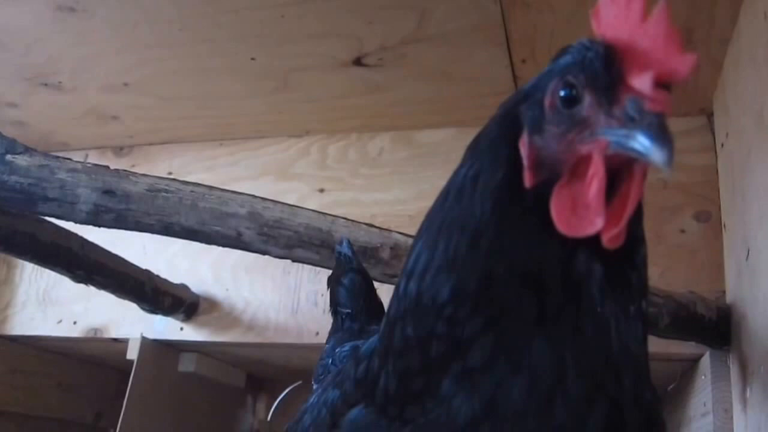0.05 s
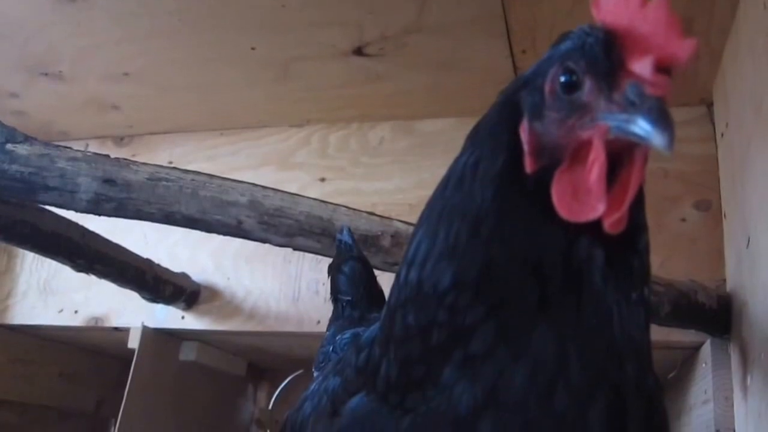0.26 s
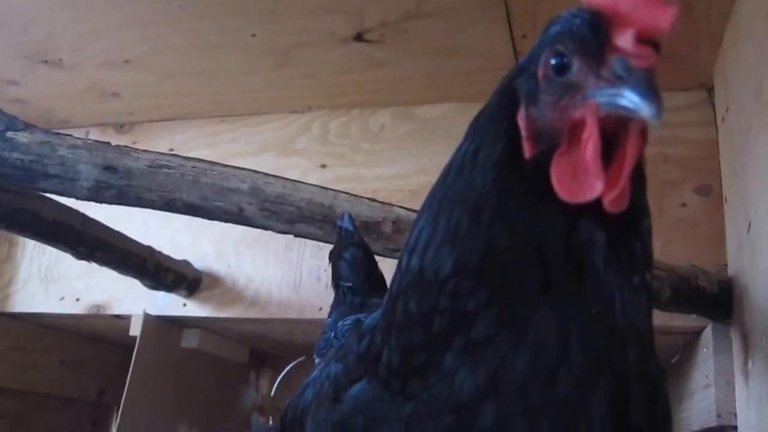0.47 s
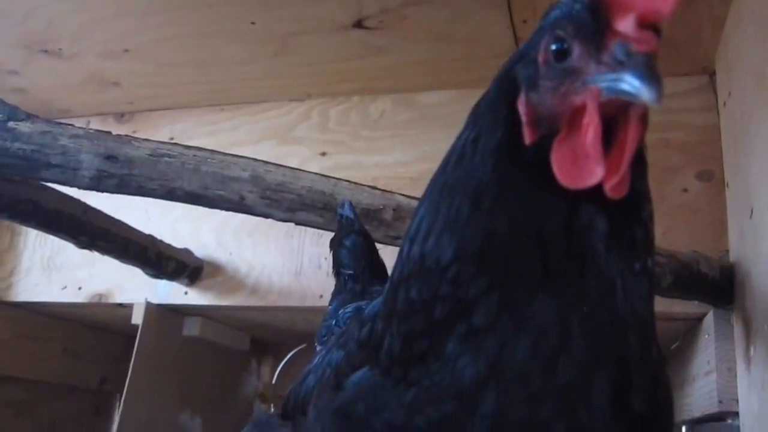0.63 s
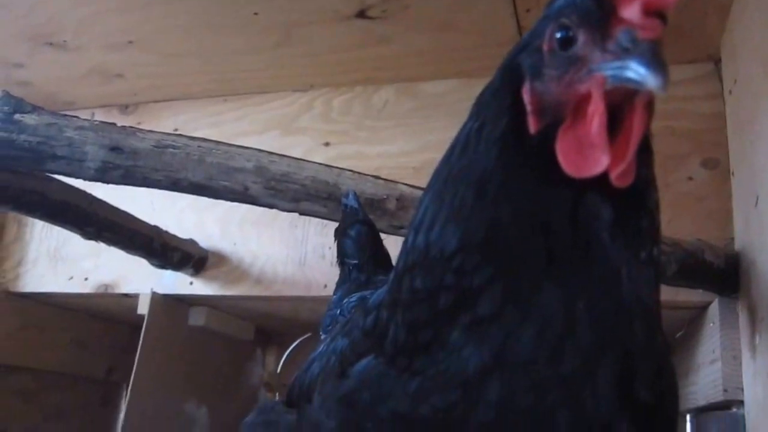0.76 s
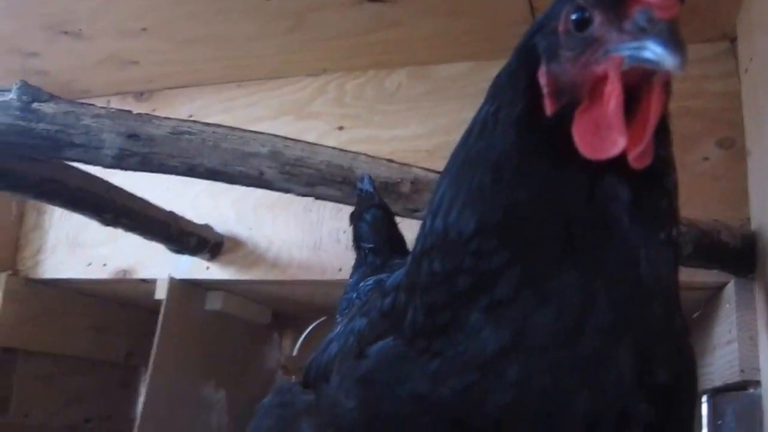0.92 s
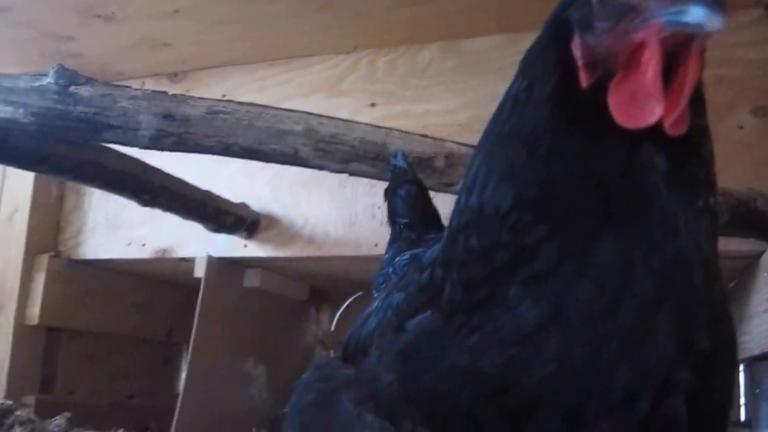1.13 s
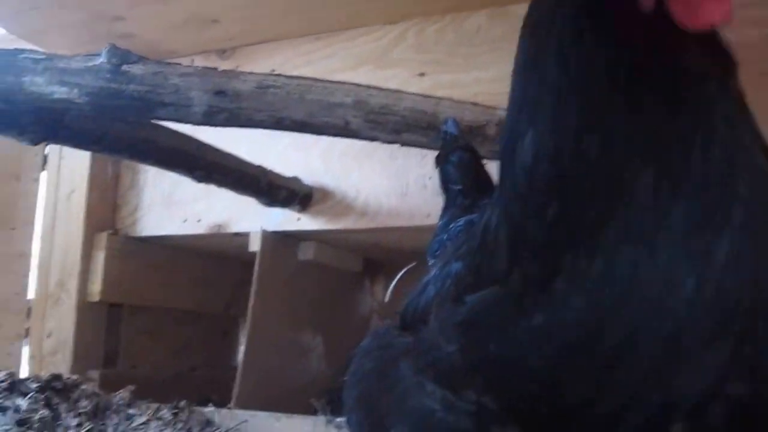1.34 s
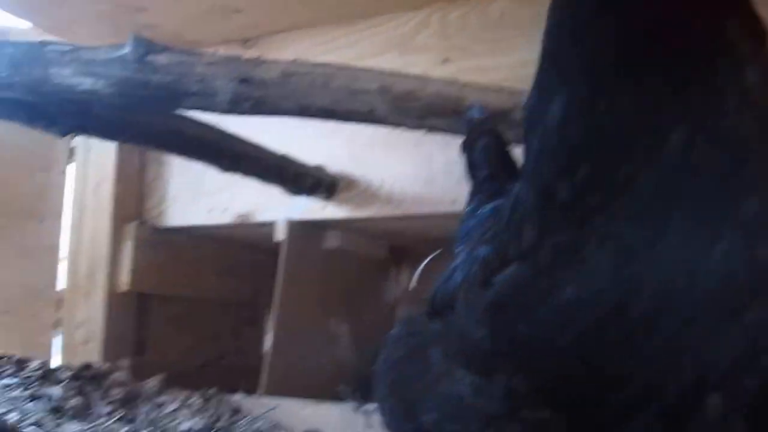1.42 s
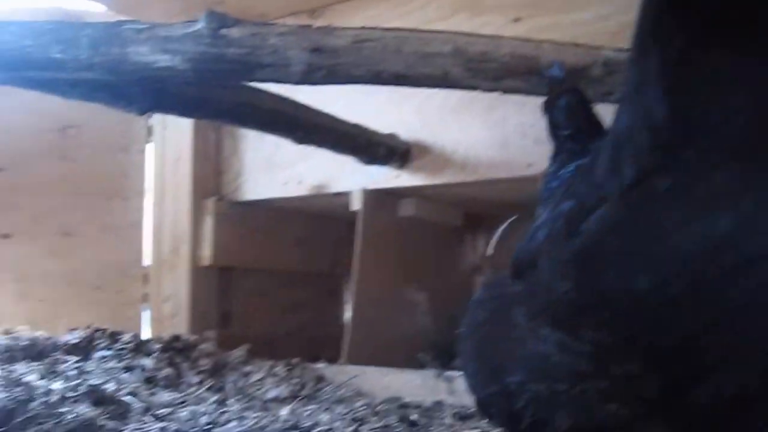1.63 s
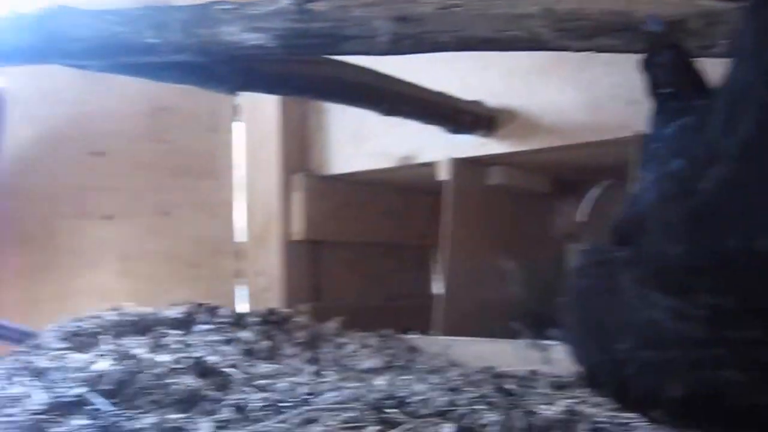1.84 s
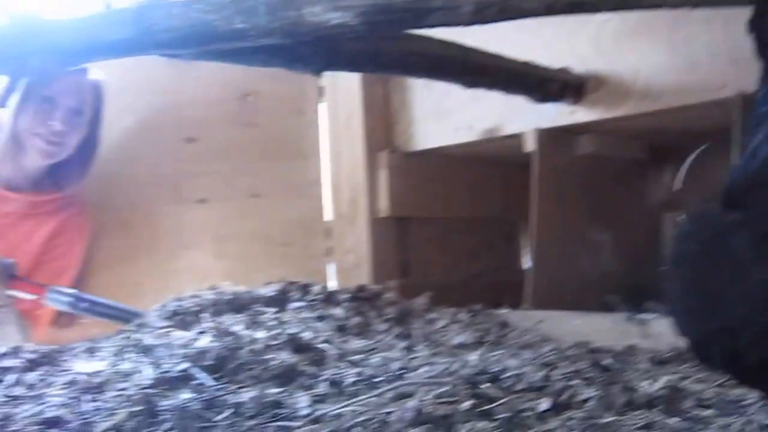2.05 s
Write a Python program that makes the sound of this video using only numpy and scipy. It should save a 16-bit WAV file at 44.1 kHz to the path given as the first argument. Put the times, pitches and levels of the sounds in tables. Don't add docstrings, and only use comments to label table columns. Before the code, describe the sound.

Hen close by: a raspy, fading croon, then five soft clucks, with creaky handling clicks at the end

```python
import sys
import numpy as np
from scipy import signal
from scipy.fft import rfft, irfft
from scipy.io import wavfile
from scipy.ndimage import uniform_filter1d

SR = 44100
rng = np.random.default_rng(int(sys.argv[2]) if len(sys.argv) > 2 else 0)


def transcribe(signal):
    frames = np.atleast_2d(signal).T
    limited = np.clip(frames, -1, 1)
    pcm = np.round(limited * 32767).astype(np.int16)
    wavfile.write(sys.argv[1], SR, pcm)


def gain_from_db(level_db):
    decades = np.asarray(level_db, float) / 20
    return 10 ** decades


N = 91948

# t/s, effort/dB, pitch f/Hz, pitch glide/share, mouth opening/0-1
CLUCKS = [
    (1.074, -39.5, 320, -.16, .05),
    (1.288, -43.5, 288, .04, .5),
    (1.505, -40.5, 390, .25, .7),
    (1.724, -39.5, 390, .26, .95),
    (1.925, -32.5, 395, .4, .15),
]


def evened(x):
    return x / np.sqrt(np.mean(x ** 2) + 1e-20)


def read(points, hz):
    f, value = np.transpose(points)
    return np.interp(np.log(hz + 1), np.log(f + 1), value)


def add(mix, s, sound):
    part = mix[..., round(s * SR):][..., :sound.shape[-1]]
    part += sound[..., :part.shape[-1]]


def wander(n, per_s):
    span = max(int(SR / per_s), 1)
    return evened(uniform_filter1d(uniform_filter1d(rng.standard_normal(n), span), span))


def resonate(x, hz, width):
    turn = np.exp(2j * np.pi * np.cumsum(hz * np.ones(len(x))) / SR)
    r = np.exp(-np.pi * width / SR)
    return 2 * (turn * signal.lfilter([(1 - r) ** 2], [1, -2 * r, r * r], x / turn)).real


def syrinx(hz, jitter, rough, count):
    turns = np.cumsum(hz * (1 + jitter * wander(len(hz), 144))) / SR
    smear = .13
    folds = sum(np.cos(2 * np.pi * (k * turns + smear * k * k)) for k in range(1, count))
    puffs = (0.16 + np.exp(-(turns % 1) / 0.35)) * rng.standard_normal(len(hz))
    rough = np.clip(rough, 0, 1)
    return (1 - rough) * evened(folds) + rough * 4.4 * evened(puffs)


def drawl():
    # t/s, effort level/dB, faster membrane/share, mouth opening/0-1, beak f/Hz
    call = [
        (0, -40, 0.15, 0.19, 1220),
        (.11, -43.5, 0.1, 0.2, 1120),
        (.16, -43, 0.47, 0.56, 1100),
        (.23, -38.5, 0.55, 0.44, 1130),
        (.33, -42, 0.68, 0.9, 1147),
        (.42, -39, 0.84, 0.72, 1196),
        (.46, -43, 1, 1.1, 1234),
        (.5, -44.5, 0.7, 1.25, 1200),
        (.525, -64, .9, 1.1, 1190),
    ]
    # shut f/Hz, open f/Hz, width/Hz, shut level/dB, open level/dB
    throat = [(343, 380, 120, -8.5, -8), (585, 520, 110, 3, -2), (657, 660, 100, -7, -2),
              (880, 760, 150, -12, -5), (1500, 1500, 900, -16, -17)]
    jitter, rough, flutter_db = .03, .28, 2
    slow_hz, start_hz, settle_s, fast_hz = 109.5, 118, .07, 131
    beak_width_hz, beak_db = 220, -3.5

    t = np.arange(0, call[-1][0], 1 / SR)
    times, *columns = np.transpose(call)
    db, fast, mouth, beak = (np.interp(t, times, c) for c in columns)
    fast = np.clip(fast, 0, 1)
    falling_hz = slow_hz + (start_hz - slow_hz) * np.exp(-t / settle_s)
    slow_pulses = syrinx(falling_hz, jitter, rough, count=22)
    fast_pulses = syrinx(fast_hz + 0 * t, jitter, rough, count=19)
    drive = ((1 - fast) * slow_pulses + fast * fast_pulses) / np.hypot(fast, 1 - fast)

    voice = gain_from_db(beak_db) * resonate(drive, beak, beak_width_hz)
    for k, (shut_hz, open_hz, width, shut_db, open_db) in enumerate(throat):
        gain = gain_from_db(shut_db + (open_db - shut_db) * mouth)
        voice += (-1) ** k * gain * resonate(drive, shut_hz + (open_hz - shut_hz) * mouth, width)
    return evened(voice) * gain_from_db(db + flutter_db * wander(len(t), 50))


def cluck(db, hz, glide, mouth):
    shut_s, open_longer_s, rise_s, fall_s = .058, .022, .015, .022
    bend_shut, bend_open, bend_steep = .92, .27, 6.5
    rasp_hz, rasp_depth = 110.4, .8
    high_shut_db, high_open_db, shut_sag_db = -8, 3.5, -12

    length = shut_s + open_longer_s * mouth
    t = np.arange(0, length, 1 / SR)
    bend = bend_shut + (bend_open - bend_shut) * mouth
    pitch = hz * (1 + glide / 2 * np.tanh(bend_steep * (t / length - bend)))
    drive = syrinx(pitch, jitter=.028, rough=.31, count=7)
    rasp_turns = np.cumsum(rasp_hz * (1 + 0.16 * wander(len(t), 65))) / SR
    drive = drive * (1 + rasp_depth * np.sqrt(mouth) * np.cos(2 * np.pi * rasp_turns))

    throat = resonate(drive, 2 * pitch, 230)
    chest = gain_from_db(-9) * resonate(drive, 1.3 * pitch, 600)
    top = gain_from_db(-20) * resonate(drive, 1770, 250)
    beak = gain_from_db(high_shut_db + (high_open_db - high_shut_db) * mouth) * resonate(drive, 1190, 320)
    voice = throat + chest + top - beak
    shape = np.clip(np.minimum(t / rise_s, (length - t) / fall_s), 0, 1)
    sag = shut_sag_db * (1 - mouth) * t / length
    return gain_from_db(db + sag) * evened(voice) * np.sin(np.pi / 2 * shape) ** 2


def coop(x):
    level_db, t60_s = -8.5, .2
    t = np.arange(int(.2 * SR)) / SR
    taps = rng.choice([-1., 1.], (2, len(t))) * (rng.random((2, len(t))) < .05)
    taps = taps * gain_from_db(-60 * t / t60_s) * (t > .002)
    taps = taps / np.linalg.norm(taps[0])
    return x + gain_from_db(level_db) * signal.fftconvolve(x[None], taps, axes=1)[:, :N]


def creak():
    # t/s, peak level/dB, brightness/dB
    slips = [(1.8597, -36, -5), (1.8782, -35, -3), (1.9472, -35, -2), (1.9552, -32, -2), (1.9632, -31, -2),
             (1.9727, -24, -2), (1.9885, -31, -10), (2.003, -31, -6), (2.0152, -29, -2), (2.0251, -26, 0),
             (2.0335, -21.5, 0), (2.0419, -21, 0), (2.0507, -22, 1), (2.0618, -24, 0), (2.0742, -26.5, -1)]
    # f/Hz, left level/dB, right level/dB, t60/s
    shell = [(1500, -19, -14, .006), (2500, -9, -20, .003), (3800, -1, -8, .0035), (4800, -9, -18, .003),
             (5760, -9, -15, .006), (6700, -10, -24, .003), (9800, -13, -20, .0025),
             (11800, -9, -17, .0025)]
    bump_db = [
        [-6],
        [-16],
    ]
    lag_s, slip_s, bump_s = .0003, .0001, .0004
    tail_db, bright_hz = -20, 4500

    out, t = np.zeros((2, N)), np.arange(1500) / SR
    for s, db, bright_db in slips:
        scrape = rng.standard_normal((2, len(t))) * gain_from_db(tail_db) * np.exp(-t / .0015)
        slip = scrape - np.exp(-((t - lag_s) / slip_s) ** 2 * 8) / 2
        slip = slip * (t > lag_s - slip_s)
        ring = np.zeros((2, len(t)))
        for f, left_db, right_db, t60 in shell:
            tone = np.sin(2 * np.pi * f * (1 + .015 * rng.standard_normal()) * t)
            side_db = np.array([[left_db], [right_db]]) + bright_db * (f > bright_hz)
            ring += gain_from_db(side_db - 60 * t / t60) * tone
        click = signal.fftconvolve(slip, ring, axes=1)[:, :len(t)]
        u = np.maximum(t - lag_s - slip_s, 0) / bump_s
        bump = gain_from_db(np.array(bump_db)) * np.e * u * np.exp(-u)
        add(out, s, gain_from_db(db - .5) * (click + bump))
    return out


def straw():
    # t/s, peak level/dB, f/Hz
    snaps = [
        (0.26, -52.5, 4800),
        (1.307, -58, 11000),
        (1.39, -56, 9900),
        (1.452, -51.5, 10700),
        (1.977, -45.5, 8700),
        (1.977, -25.5, 950),
    ]
    out, t = np.zeros((2, N)), np.arange(1500) / SR
    for s, db, hz in snaps:
        burst = rng.standard_normal((2, len(t))) * np.exp(-t / 0.0022)
        snap = np.array([resonate(side, hz, 1.04 * hz) for side in burst])
        add(out, s, gain_from_db(db) * 3.6 * snap)
    return out


def feathers():
    # t/s, length/s, level/dB
    brushes = [
        (0.665, 0.2, -58.5),
        (1.837, 0.085, -62.5),
        (1.946, 0.026, -55.5),
        (2.001, 0.16, -53),
    ]
    out = np.zeros((2, N))
    for s, length, db in brushes:
        n = int(length * SR)
        fizz = rng.standard_normal((2, n)) * gain_from_db(1.5 * rng.exponential(1, n)) * np.hanning(n)
        add(out, s, gain_from_db(db) * evened(np.array([resonate(side, 4700, 14000) for side in fizz])))
    return out


def engine():
    # level/dB rms, wander/dB, load/share, air path/share
    orders = [(-49.5, -1.5, 0.45, 0.84), (-46, 1.5, .9, 0.39), (-55.5, 0, 0.24, 0),
              (-41.5, 0.54, 0.33, 0.018), (-47, -1, 0, 0.62), (-54, 2, 0.92, 0.36), (-51, 2.5, 0.085, 1.35),
              (-62, 2.5, 1, 0.48), (-75, 1, 0.62, 0)]
    multiples = (3, 4, 6, 8, 9, 12, 16, 20, 24)
    # t/s, level/dB
    load_points = [
        (0, -5),
        (.7, -2.5),
        (1.2, 2),
        (1.598, 2),
        (2.1, 4),
    ]
    # t/s, level/dB
    path_points = [
        (0, 4),
        (0.301, .5),
        (.65, 0.5),
        (.9, -3),
        (1.2, -4),
        (1.55, 1.5),
        (2.1, 0.5),
    ]
    cycle_hz, drift = 17.82, .0004

    t = np.arange(N) / SR
    turns = np.cumsum(cycle_hz * (1 + drift * wander(N, 2.8))) / SR
    load = np.interp(t, *np.transpose(load_points))
    path = np.interp(t, *np.transpose(path_points))
    out = np.zeros(N)
    for k, (db, wander_db, share, far) in zip(multiples, orders):
        level_db = db + share * load + far * path + wander_db * wander(N, 5.3)
        out += np.sqrt(2) * gain_from_db(level_db) * np.cos(2 * np.pi * (k * turns + rng.random()))
    return out * gain_from_db([[-.4], [.4]])


def whir():
    hz, width_hz, level_db, peak_s, spread_s = 1532, 61, -63, 0.97, 0.3
    t = np.arange(N) / SR
    air = resonate(rng.standard_normal(N), hz * (1 + 0.012 * wander(N, 4.1)), width_hz)
    return gain_from_db(level_db) * evened(air) * np.exp(-((t - peak_s) / spread_s) ** 2)


def wash():
    # f/Hz, level/dB per Hz
    colour = [(25, -7), (60, -3), (180, -5.5), (500, -12), (1500, -18), (2500, -25), (6000, -31),
              (15500, -39.5)]
    # f/Hz, correlation/-1 to 1
    likeness = [(60, 0.99), (180, 0.72), (550, 0.78), (1650, 0.62), (4970, -0.19), (15000, 0.18)]
    # f/Hz, level/dB
    balance = [(60, -7), (240, 0.5), (950, -1), (3770, -0.5), (15000, -1.5)]
    level_db, patch_db, swell_db = -45, 0.5, 1.02

    frames, hz = N // 256 + 5, np.fft.rfftfreq(1024, 1 / SR)
    a, b, c, d, patches = rng.standard_normal((frames, 513, 5)).T
    patches = evened(uniform_filter1d(uniform_filter1d(patches, 12, 0), 14, 1))
    swell = evened(uniform_filter1d(rng.standard_normal(frames), 30))
    same = np.clip(read(likeness, hz), -1, 1)[:, None]
    lean = read(balance, hz)[:, None] / 2
    left = a + 1j * b
    right = same * left + np.sqrt(1 - same ** 2) * (c + 1j * d)
    z = np.array([left * gain_from_db(lean), right * gain_from_db(-lean)])
    z *= gain_from_db(read(colour, hz)[:, None] + patch_db * patches + swell_db * swell)
    return gain_from_db(level_db) * evened(signal.istft(z, nperseg=1024, noverlap=768)[1][:, :N])


def scene():
    hen = np.zeros(N)
    add(hen, 0, drawl())
    for s, *row in CLUCKS:
        add(hen, s, cluck(*row))
    return coop(hen) + creak() + straw() + feathers() + engine() + whir() + wash()


def top_cut(x):
    return signal.sosfilt(signal.butter(12, 15930, fs=SR, output="sos"), x)


def record(dry):
    # f/Hz, level/dB rms
    whine_lines = [(8802, -78), (8823, -83), (8845, -92)]
    notch_hz, notch_width_hz, notch_db = 8190, 590, -18.5
    edge_hz, roll_hz = 15950, 13900

    hz = np.fft.rfftfreq(N, 1 / SR)
    notch = gain_from_db(notch_db / (1 + ((hz - notch_hz) / notch_width_hz) ** 2))
    colour = notch * (hz < edge_hz) / np.sqrt(1 + (hz / roll_hz) ** 8)
    t = np.arange(N) / SR
    whine = sum(np.sqrt(2) * gain_from_db(db) * np.sin(2 * np.pi * f * t) for f, db in whine_lines)
    return top_cut(irfft(rfft(dry) * colour, N) + whine)


dry = scene()
out = record(dry)
transcribe(out)
```